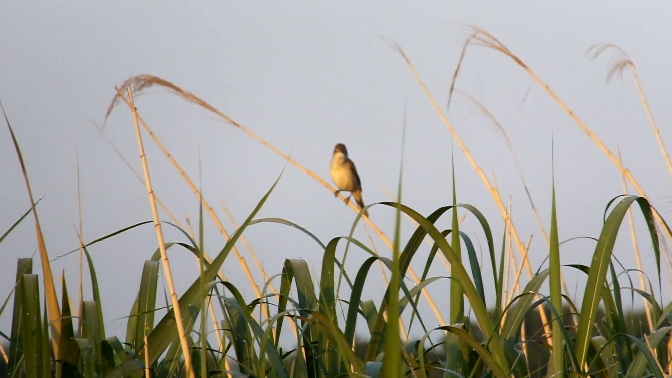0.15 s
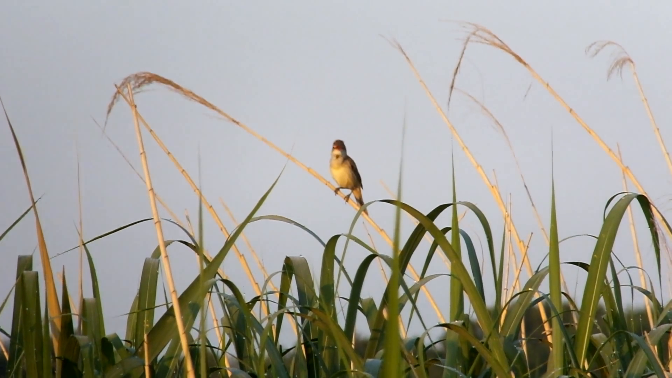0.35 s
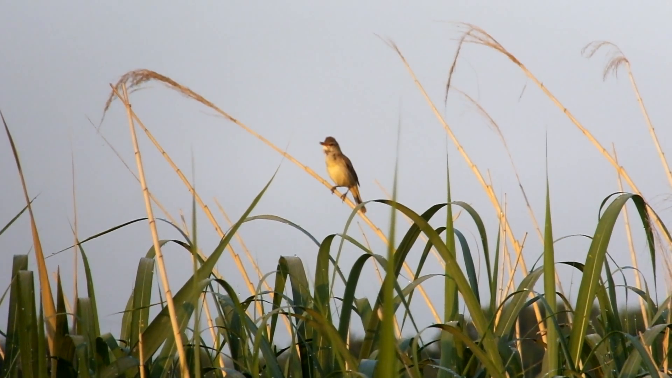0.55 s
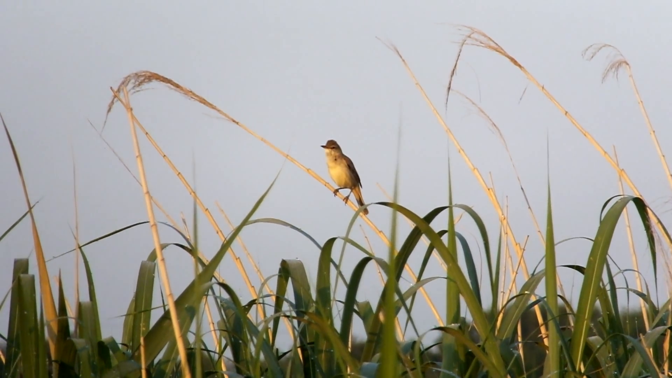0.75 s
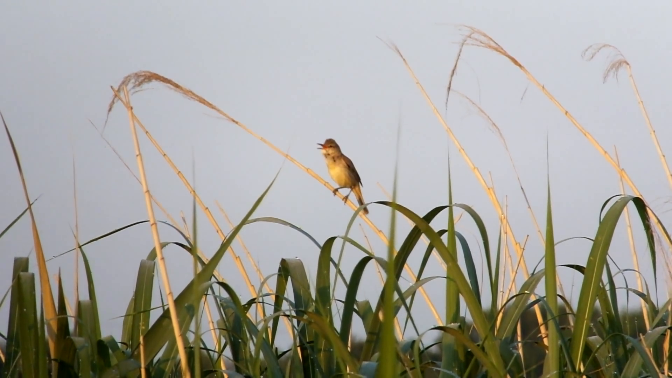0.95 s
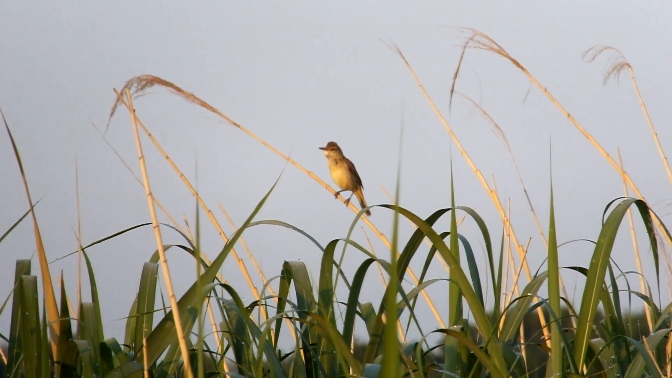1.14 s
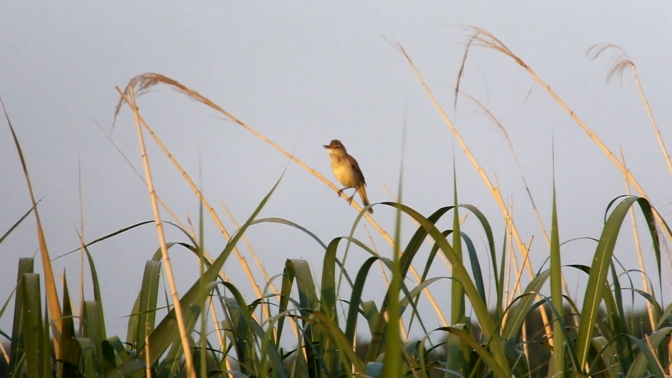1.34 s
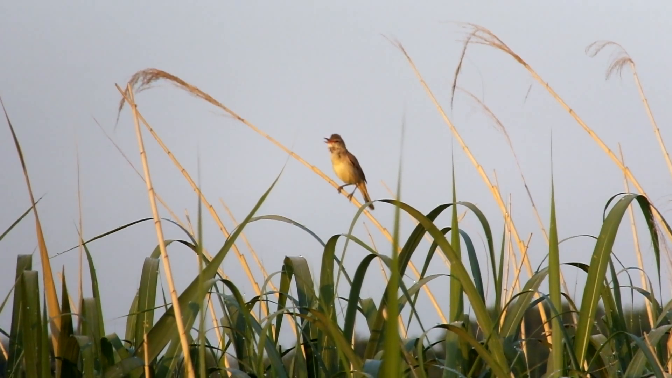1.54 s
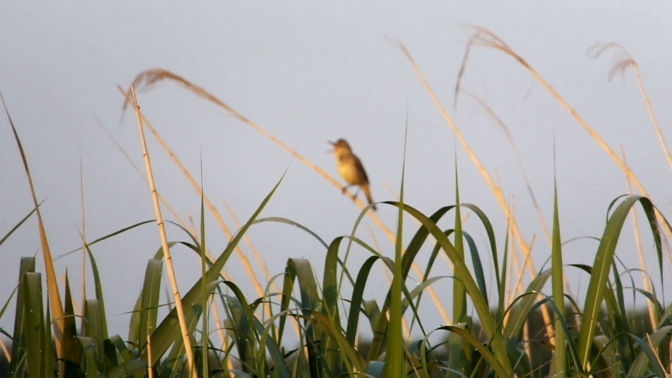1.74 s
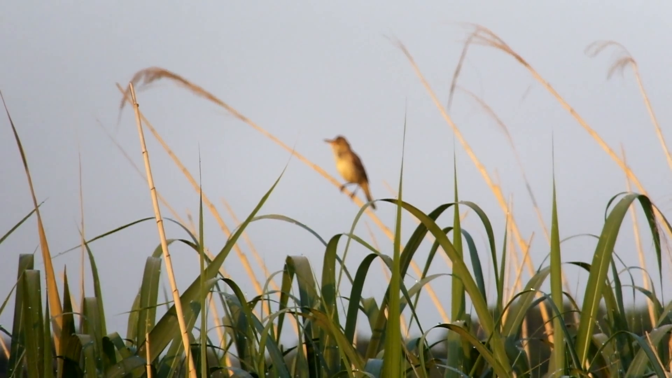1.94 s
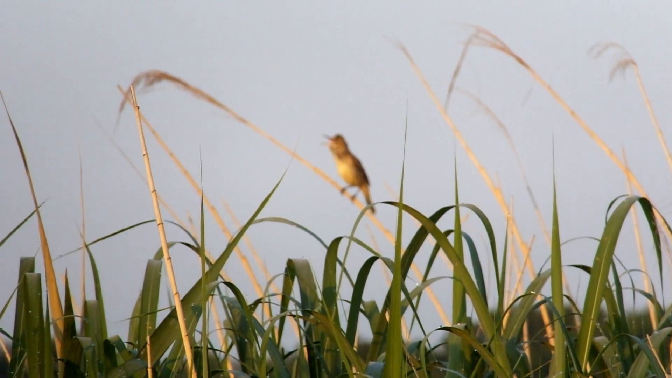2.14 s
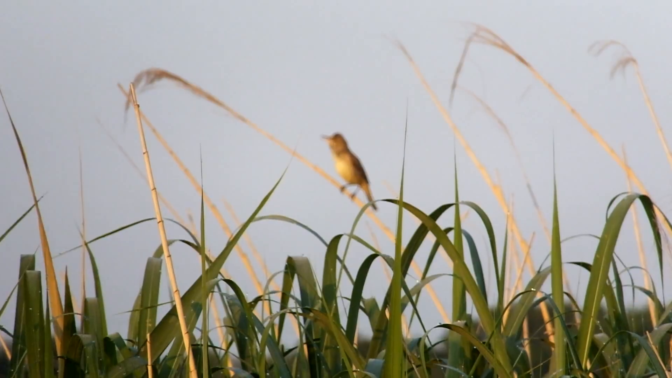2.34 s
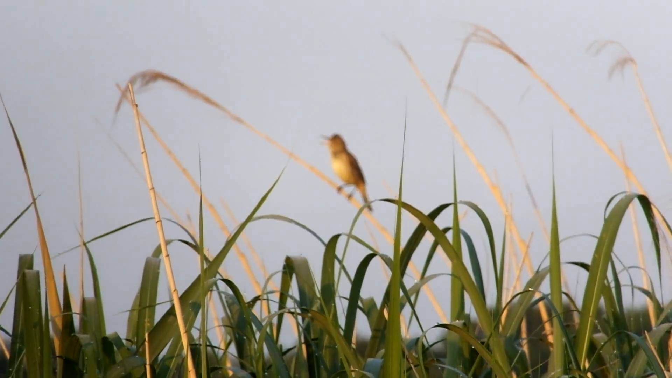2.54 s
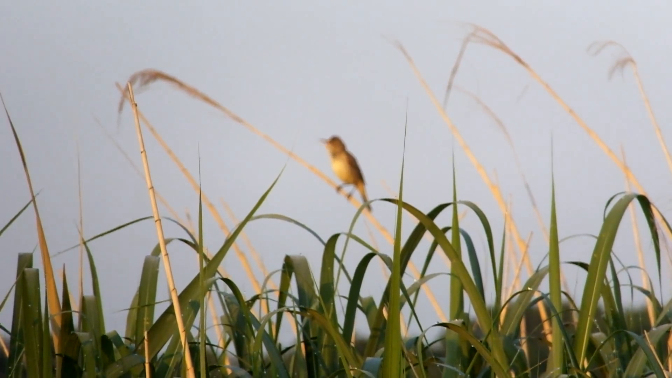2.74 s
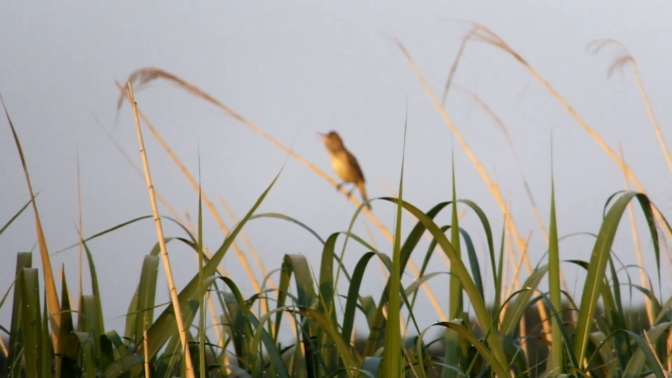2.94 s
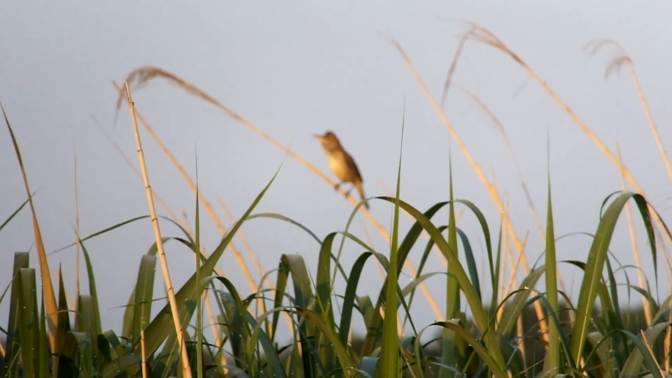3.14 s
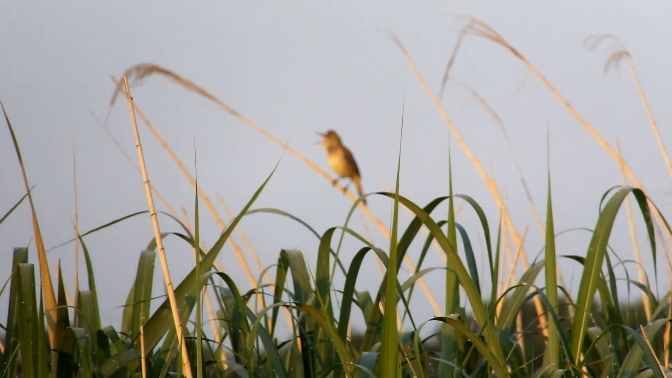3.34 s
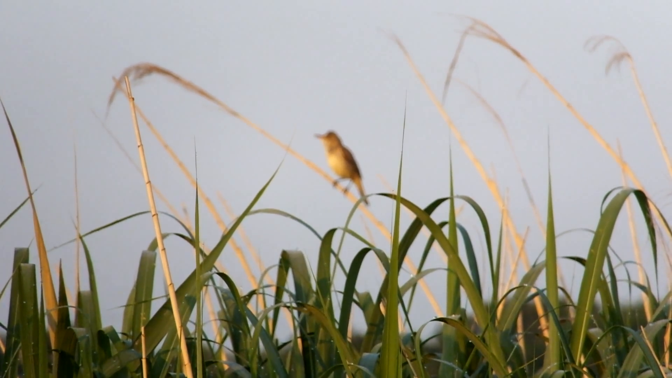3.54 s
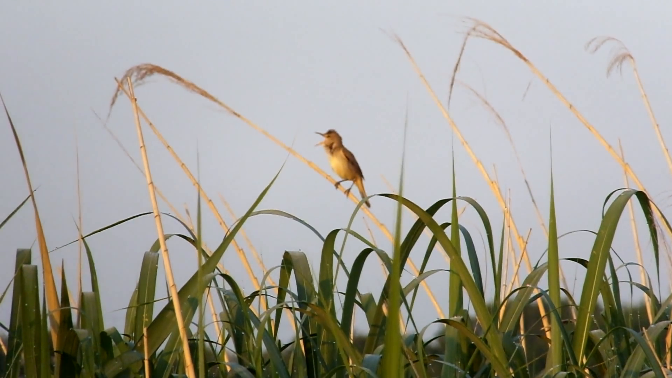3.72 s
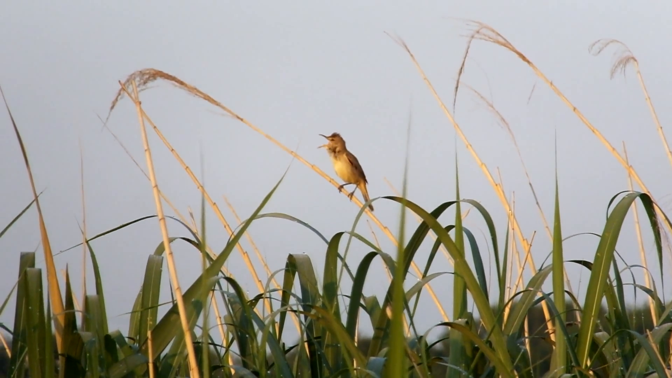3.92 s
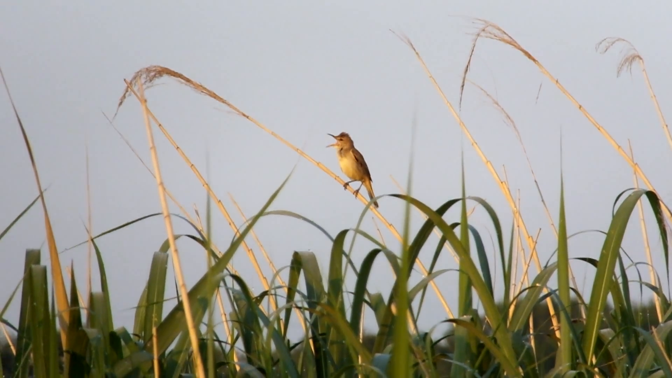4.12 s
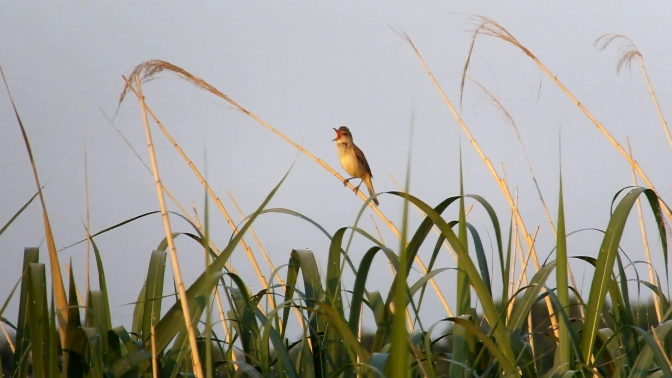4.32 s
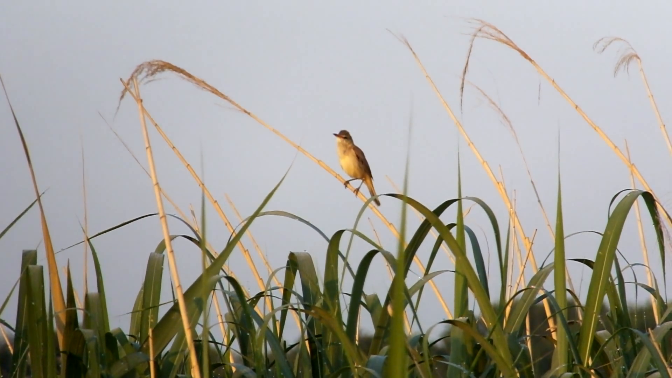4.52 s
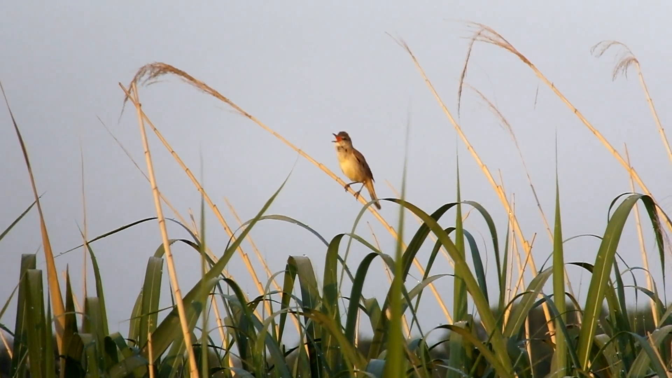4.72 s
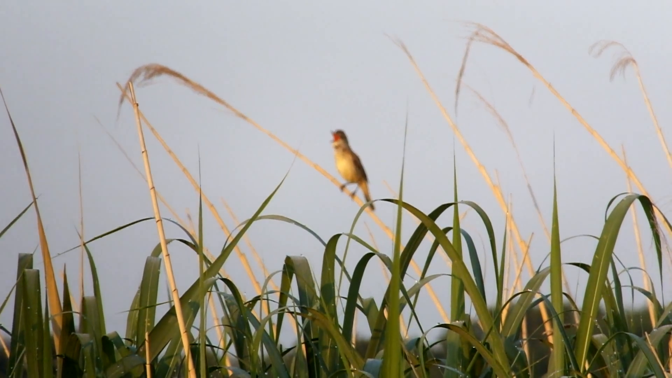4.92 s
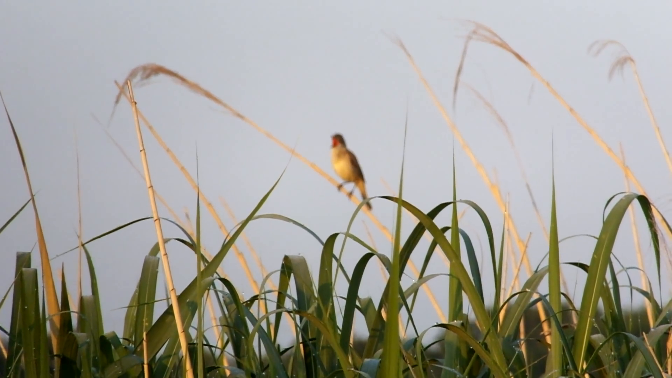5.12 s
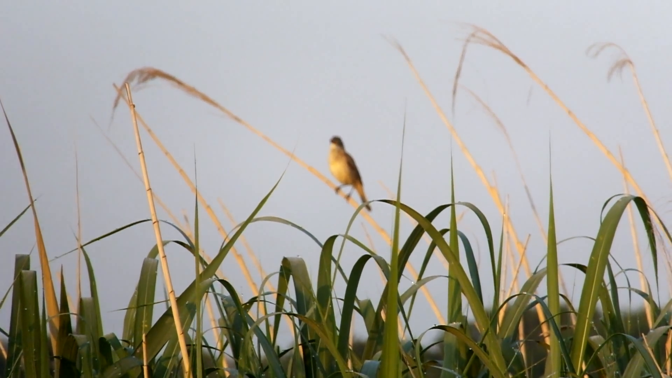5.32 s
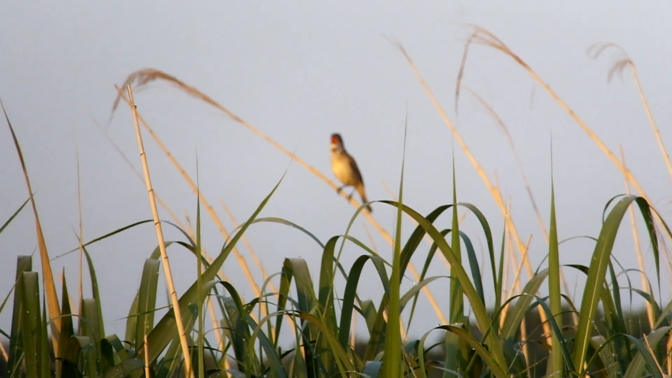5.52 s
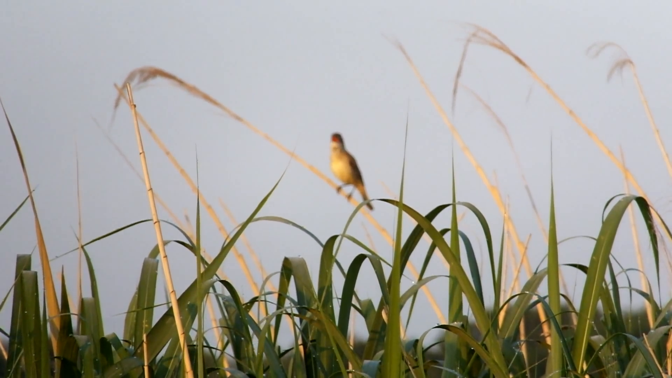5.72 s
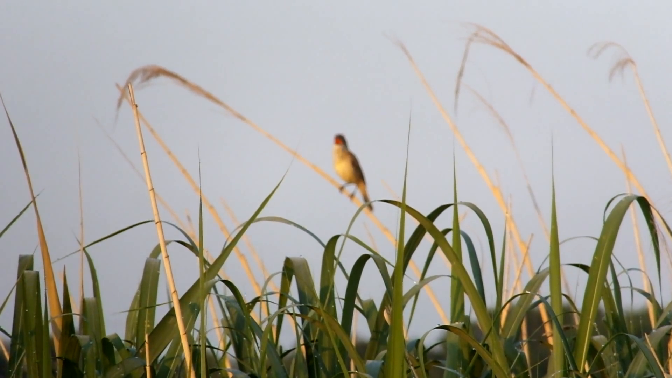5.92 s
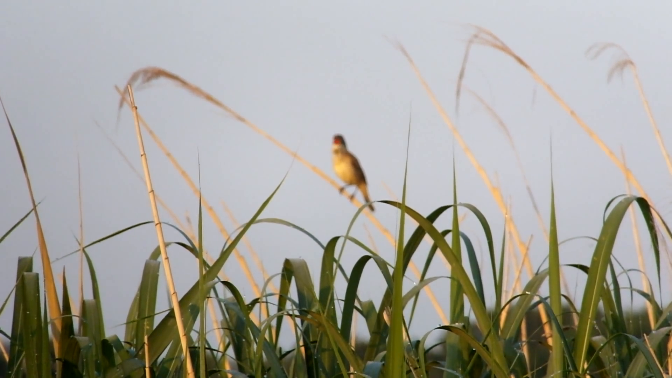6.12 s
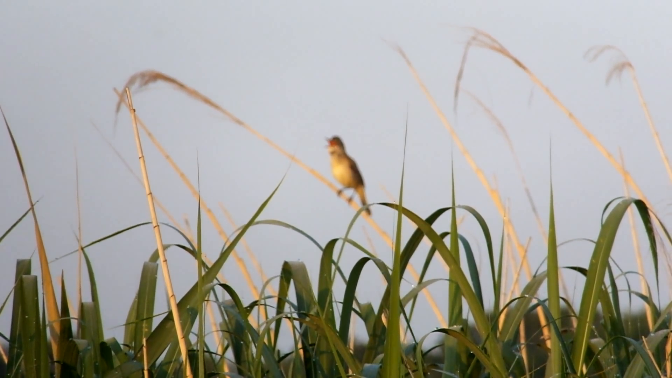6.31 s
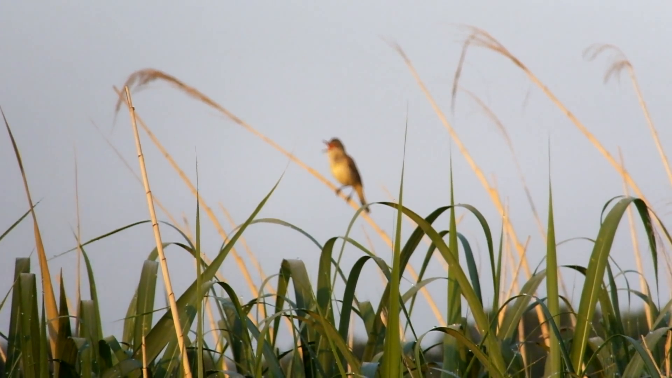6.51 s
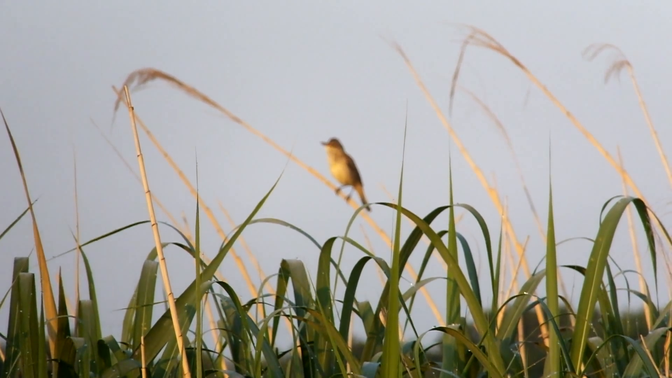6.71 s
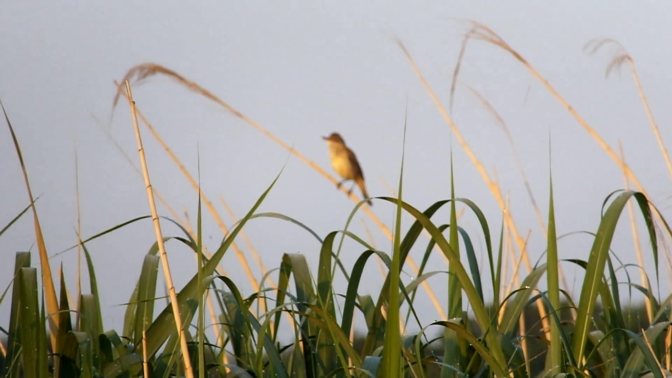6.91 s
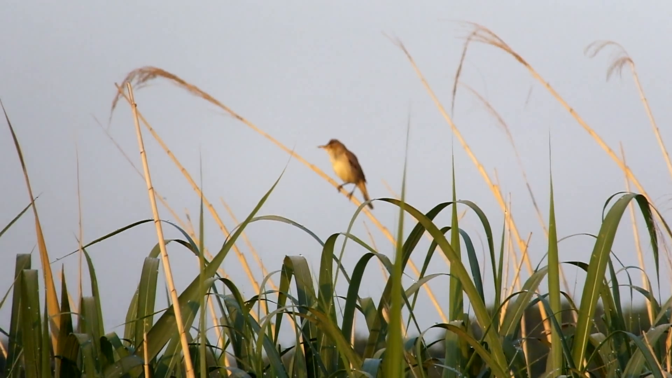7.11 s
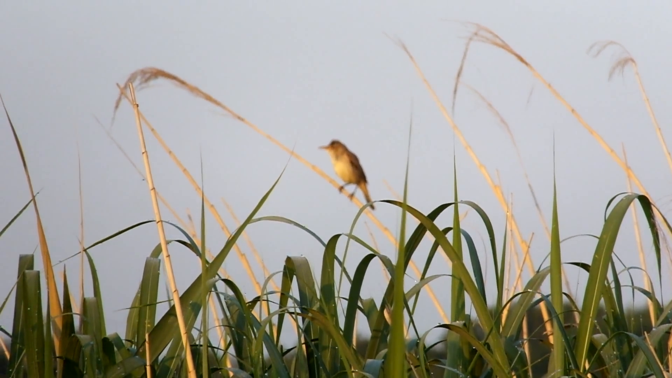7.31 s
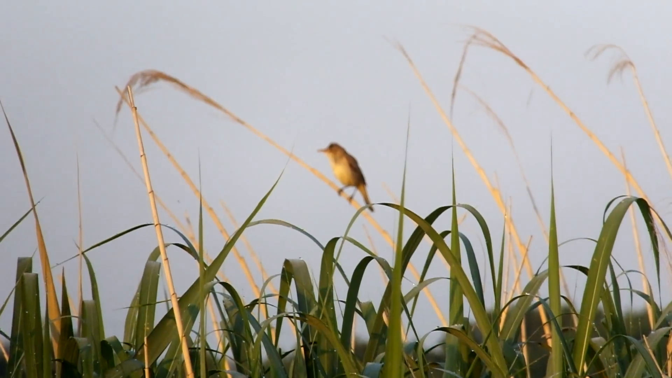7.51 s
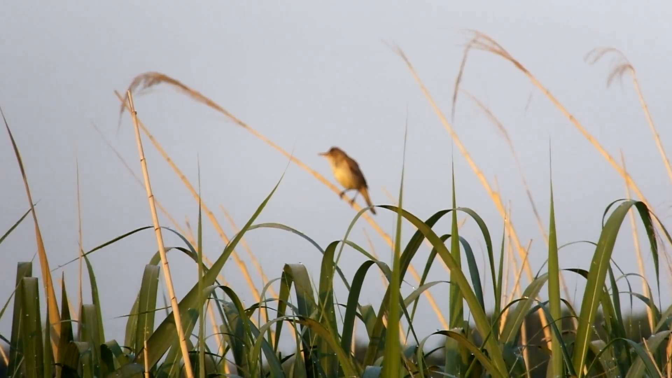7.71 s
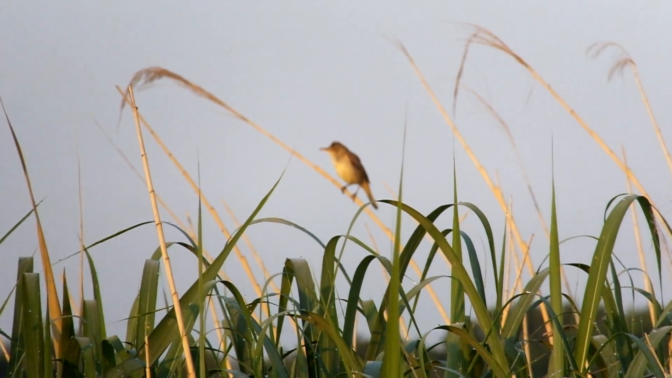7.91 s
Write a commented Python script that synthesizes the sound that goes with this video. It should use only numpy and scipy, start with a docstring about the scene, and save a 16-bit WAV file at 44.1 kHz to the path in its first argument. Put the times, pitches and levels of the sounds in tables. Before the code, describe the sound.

Loud, dry, chattering warbler song among reeds, in stereo, with a short leafy scatter and little echo. Croaks give way to double croaks and cracking squeaks, then quick rasps and upward whistles, then three rounds of two rattles and a buzzing trill. Behind are a faint steady low hiss and a briefly humming far motor. A dull tap hits the left microphone midway; a faint distant bird and low wind follow the song.

```python
"""A reed warbler sings: dry creaks, harsh croaks and rattles, swelling rasps, thin whistles, squeaks that
break to a lower voice, and buzzy trills. Uneven pulses and breath drive the harsh voice; gliding tones
make the pure one; reeds scatter both. Behind it the marsh hisses (shaped noise), a far motor hums and a
far bird calls (narrow noise bands), and wind buffets late, mostly at the right. A few sharp ticks (dying
modes) sound at the left, and something taps the left microphone once."""
import sys
import numpy as np
from scipy import signal
from scipy.fft import rfft, irfft, next_fast_len
from scipy.io import wavfile

SR = 44100
rng = np.random.default_rng(int(sys.argv[2]) if len(sys.argv) > 2 else 0)


def unload_audio(sound):
    """Save the sound as a 16-bit wav file, at the path given as the first command line argument."""
    columns = np.transpose(np.atleast_2d(sound))
    # keep every value between -1 and 1, then stretch to whole-number steps
    steps = np.round(np.clip(columns, -1, 1) * 32767)
    wavfile.write(sys.argv[1], SR, steps.astype(np.int16))


N = 355269
TIME_S = np.arange(N) / SR

# marsh spectrum: (frequency [Hz], relative level [dB])
MARSH_SPECTRUM = [(20, -19.5), (40, -4.5), (75, 1), (210, -1.5), (300, -6.5), (500, -11), (850, -9.5),
                  (1500, -17.5), (2600, -20.5), (3600, -27.5), (4600, -20.5), (5700, -35.5), (9500, -47.5),
                  (15000, -72)]
# marsh likeness of the two channels: (frequency [Hz], correlation [-1..1])
MARSH_CORRELATION = [(60, 0.86), (180, 0.91), (550, 0.78), (1650, 0.58), (4970, -0.43), (15000, 0.8)]
# marsh balance: (frequency [Hz], left over right [dB])
MARSH_BALANCE = [(60, -0.5), (180, 0.5), (550, 1), (1650, 3), (4970, 9.5), (15000, -13.5)]
MARSH_DB = -46.82
# far motor: (time [s], level [dB], pitch [Hz])
MOTOR = [(1.9, -67, 109.4), (2.1, -50, 109.6), (2.6, -52.5, 113.3), (3.1, -51, 122.5), (3.55, -53.5, 126.6),
         (3.9, -72, 122)]
# far bird: (time [s], level [dB], pitch [Hz])
FAR_CALL = [(7.1, -75, 1600), (7.22, -57, 1660), (7.33, -59, 1610), (7.41, -59, 1490), (7.46, -75, 1450)]
# wind on the microphones, before the left/right gains: (time [s], level [dB])
GUST = [(7.45, -67), (7.6, -44.5), (7.77, -43), (7.86, -52), (7.94, -48), (7.99, -29.5), (8.06, -40)]

TAP_S = 4.0955
# ring of the tapped microphone's housing: (frequency [Hz], level [dB], t60 [s])
TAP_MODES = [(91, -24.5, 0.051), (161, -16.5, 0.047), (214, -25.5, 0.16), (736, -13.5, 0.012),
             (3080, -27, .005), (4970, -12.5, 0.0025)]
# sharp ticks, before the left/right gains: (time [s], level [dB])
TICKS = [(1.65, -26), (2.4111, -21), (5.3148, -25.5), (6.950, -30.5)]
# ring of a tick: (frequency [Hz], relative level [dB], t60 [s])
TICK_MODES = [(3360, 1.5, 0.012), (4060, 1, 0.0087), (4850, -7.5, 0.015), (6730, -7.5, 0.003),
              (9550, -21.5, 0.0036)]

# song at the left microphone: (frequency [Hz], gain [dB])
LEFT_SHADE = [(1300, -1.5), (2400, -3), (4400, 0), (6000, -1.5), (9500, -13), (15000, 0.5)]
# beak: (frequency [Hz], gain [dB])
BEAK = [(6500, -1), (8300, 2), (9800, 5), (11000, -7), (12500, -10), (15000, -32)]
# fixed peaks and dips of the harsh voice: (centre [Hz], width [Hz], gain [dB])
HARSH_PEAKS = [(1270, 170, 9), (1560, 80, -11), (1850, 120, 7), (2030, 60, -7), (2260, 60, -8),
               (2430, 85, 6.5), (2590, 60, -5), (2800, 100, 2), (3100, 120, -3), (3330, 80, 3),
               (3510, 60, -5), (3740, 130, 4)]
# broad skirt of the voice's pulses: (frequency [Hz], relative gain [dB])
PULSE_SKIRT = [(300, -29), (1100, 4), (2500, 24), (4400, -22.5), (5700, 10), (7700, 1.5), (9000, 2.5),
               (12300, -40), (14000, -65), (15500, -74)]
# treble of the croaks and rattles: (frequency [Hz], gain [dB])
CROAK_TREBLE = [(3000, -0.5), (3900, 0.5), (4600, -5), (5900, -8), (7500, 5.5), (10000, 3), (12500, -1)]

# opening croaks: (start [s], nominal level [dB], centre [Hz])
CROAKS = [(.514, -32, 2370), (1.062, -32, 2427)]
CROAK_S, CROAK_SWELL_S, CROAK_SOFT_DB = 0.078, 0.0281, -9
# moments when a croak catches: (time after its start [s])
CROAK_CATCHES_S = [0.01, 0.0243, 0.058]
CREAK_LEAD_S, CREAK_S, CREAK_DB, CREAK_PULSE_HZ = 0.13, 0.12, -44, 219.4

# double croaks: (start [s], start of short pulse [s], nominal level [dB], long pulse [Hz], short pulse [Hz])
DOUBLES = [(1.461, 1.512, -33.5, 1952, 2057), (1.605, 1.656, -34, 2020, 2290),
           (2.156, 2.211, -32, 2326, 2450), (2.314, 2.366, -34.5, 1938, 2250),
           (2.456, 2.512, -34.5, 2147, 2094), (2.968, 3.023, -32, 2246, 2225),
           (3.124, 3.178, -33.5, 2134, 2180)]
PAUSE_S, SHORT_S, SHORT_DB, SHORT_FALL_HZ = 0.0077, 0.02354, -0.4, 520
SCOOP_HZ, SCOOP_S, CLIMB_HZ = 633, 0.00708, 296  # the long pulse drops into its pitch, then climbs
ACCENT_DB, ACCENT_S, HOLD_DB, CLIMB_DB = 6, 0.015, -3, 4.5  # it starts accented and swells as it climbs

# rattles: (start [s], end [s], first stop [s], second stop [s], nominal level [dB], centre [Hz],
#           level of the creak before it [dB])
RATTLES = [(4.786, 4.862, 4.807, 4.837, -29, 2883, -34.5), (4.946, 5.019, 4.967, 4.999, -27.7, 2960, -35),
           (5.508, 5.587, 5.528, 5.562, -29, 2788, -37.5), (5.673, 5.751, 5.699, 5.728, -27.5, 2983, -30.5),
           (6.191, 6.269, 6.213, 6.243, -28.6, 2838, -32.5), (6.366, 6.445, 6.388, 6.416, -29, 2793, -28.5)]
RATTLE_SAG_HZ, STOP_S, STOP_DB = 219, 0.0023, -21.5
STUTTER_S, STUTTER_DB = 0.01, -7.5  # a weaker stop just before the second
LEAD_IN_S, LEAD_IN_PULSE_HZ = .029, 154

# rasps: (start [s], end [s], nominal peak level [dB])
RASPS = [(3.641, 3.717, -28.5), (3.741, 3.814, -28.5), (3.934, 4.006, -28.5), (4.036, 4.105, -29.5),
         (4.233, 4.304, -28), (4.333, 4.403, -26.5)]

# rising whistles: (start [s], end [s], peak level [dB], start pitch [Hz], end pitch [Hz])
WHISTLES = [(3.365, 3.421, -39.5, 4900, 6250), (3.843, 3.9, -39.5, 5820, 6360),
            (4.14, 4.189, -37.5, 5430, 6520), (4.439, 4.5, -40, 5550, 6330)]
# squeaks: (start [s], break [s], end [s], whistle level [dB], whistle pitch [Hz], its rise [Hz], yelp [Hz])
SQUEAKS = [(1.748, 1.779, 1.794, -37.5, 5530, 204, 3340), (1.852, 1.876, 1.904, -41, 5300, 500, 3140),
           (2.599, 2.637, 2.654, -40.5, 5400, 302, 3230), (2.711, 2.743, 2.762, -39.5, 5310, 500, 3196),
           (3.264, 3.288, 3.318, -40, 5360, -400, 3150)]
OVERLAP_S, YELP_DB, YELP_RISE_HZ = 0.0098, 1, 554

# trills: (start [s], end [s], nominal level [dB], centre [Hz], dip [Hz])
TRILLS = [(5.083, 5.235, -38.5, 5270, 600), (5.811, 5.984, -38.5, 4820, 118),
          (6.509, 6.661, -39.5, 4910, 279)]
TRILL_RATE_HZ, TRILL_END_HZ, TRILL_DEPTH_HZ = 144, 3930, 572
DIP_AT, DIP_WIDTH, SINK_FROM = .36, .13, 0.55  # shares of a trill's length
# windpipe's pass band in a trill: (frequency [Hz], gain [dB])
TRILL_THROAT = [(2600, -9), (3300, -5), (3780, 6), (4150, -2), (5250, 1.5), (5800, -4.5), (6500, 7.5),
                (9000, -1)]


def amp(db):
    """Decibels to gain."""
    return 10 ** (np.asarray(db) / 20)


def unit(x):
    """Scales to rms 1."""
    return x / np.sqrt(np.mean(abs(x) ** 2) + 1e-20)


def read(points, hz):
    """Reads a table on a log-frequency axis."""
    f, value = np.transpose(points)
    return np.interp(np.log(hz + 1), np.log(f + 1), value)


def add(mix, start_s, sound):
    """Mixes a sound in at start_s."""
    part = mix[round(start_s * SR):][:len(sound)]
    part += sound[:len(part)]


def span(start_s, end_s):
    """Progress from 0 to 1 through a note, one value a sample."""
    return np.linspace(0, 1, max(round((end_s - start_s) * SR), 64))


def bump(x, centre, width):
    """A smooth hump of height 1."""
    return np.exp(-((x - centre) / width) ** 2)


def noise(size):
    """White noise from a stream of its own."""
    return rng.spawn(1)[0].standard_normal(size)


def wander(size, rate_hz):
    """Random curve of rms near 1: straight lines between rate_hz knots a second."""
    at = np.arange(size) * rate_hz / SR
    knots = noise(int(at[-1]) + 2)
    return 1.2 * np.interp(at, np.arange(len(knots)), knots)


def fade(u, rise_s, fall_s):
    """Opens and closes a note of u's length."""
    t = np.arange(len(u)) / SR
    return np.clip(t / rise_s, 0, 1) * np.clip((t[-1] - t) / fall_s, 0, 1)


def phase(hz):
    """Running phase [rad] of a pitch curve."""
    return 2 * np.pi * np.cumsum(hz) / SR


def filtered(x, order, edge_hz, kind="low"):
    """Butterworth filter."""
    return signal.lfilter(*signal.butter(order, edge_hz, kind, fs=SR), x)


def resonate(x, hz, width_hz):
    """A steep, movable resonance; the result is complex, its size is the envelope."""
    turn = np.exp(1j * phase(hz * np.ones(len(x))))
    lowpass = signal.butter(3, width_hz / 2, fs=SR, output="sos")
    return unit(turn * signal.sosfilt(lowpass, x / turn))


def colour(x, db_at):
    """Causal (minimum-phase) filter whose gain in dB is a function of frequency."""
    log_gain = np.log(amp(db_at(abs(np.fft.fftfreq(2048, 1 / SR)))))
    impulse = np.fft.ifft(np.exp(np.conj(signal.hilbert(log_gain)))).real
    return signal.fftconvolve(x, impulse)[:len(x)]


def marsh():
    """Low far rumble and soft hiss with a band of sizzle to the left; the level wavers slightly."""
    size = next_fast_len(N)
    hz = np.fft.rfftfreq(size, 1 / SR)
    a, b = rfft(noise(size)), rfft(noise(size))
    same = np.clip(read(MARSH_CORRELATION, hz), -1, 1)
    tilt_db = read(MARSH_BALANCE, hz) / 2
    left = a * amp(tilt_db)
    right = (same * a + np.sqrt(1 - same ** 2) * b) * amp(-tilt_db)
    hiss = irfft(np.array([left, right]) * amp(read(MARSH_SPECTRUM, hz)), size)[:, :N]
    return amp(MARSH_DB + .5 * wander(N, 5)) * unit(hiss)


def far_line(rows, width_hz):
    """A distant pitched sound, blurred on its way: a narrow noise band with its swing saturated."""
    s, db, hz = np.transpose(rows)
    out, t = np.zeros(N), np.arange(s[0], s[-1], 1 / SR)
    line = resonate(noise(len(t)), np.interp(t, s, hz), width_hz)
    steadied = unit((line / (abs(line) + .5)).real)
    add(out, s[0], amp(np.interp(t, s, db)) * steadied)
    return out


def gust():
    """Lumpy low buffeting: band-passed noise, mostly on the right microphone."""
    s, db = np.transpose(GUST)
    lumps = np.array([unit(filtered(noise(N), 2, [22, 130], "band")) for side in range(2)])
    return lumps * amp(np.interp(TIME_S, s, db, left=-120)) * amp([[-10], [1]])


def ring(modes, t, rise_s):
    """Dying modes after a soft-edged blow."""
    dying = sum(amp(db - 60 * t / t60) * np.sin(2 * np.pi * hz * t) for hz, db, t60 in modes)
    return dying * (1 - np.exp(-(t / rise_s) ** 2))


def tap(push_db=-3, push_s=0.00018):
    """A brief push of pressure on one microphone; its housing swings back and rings."""
    out, t = np.zeros(N), np.arange(6000) / SR
    add(out, TAP_S - .001, amp(push_db) * bump(t, .0013, push_s))
    add(out, TAP_S + 0.00061, -ring(TAP_MODES, t, rise_s=0.00009))
    return out


def ticks():
    """Short dry ticks, close by: quickly dying modes."""
    out, t = np.zeros(N), np.arange(2000) / SR
    for start, db in TICKS:
        add(out, start, amp(db) * ring(TICK_MODES, t, rise_s=0.00032))
    return out


def reeds(x, t60=0.45, leaf_db=-7, leaf_s=0.0073, stem_db=-21, stem_s=0.023, late_db=-23):
    """Leaves spray the treble back, stems the middle; a faint dull tail follows."""
    t = np.arange(SR // 2) / SR
    out = []
    for side in range(2):
        leaves = filtered(noise(len(t)), 2, 7000, "high") * np.exp(-t / leaf_s) * (t > .001)
        stems = filtered(noise(len(t)), 1, 6000) * np.exp(-t / stem_s) * (t > .002)
        far = filtered(noise(len(t)), 2, 4500) * amp(-60 * t / t60) * (t > .008)
        parts = [(leaf_db, leaves), (stem_db, stems), (late_db, far)]
        echo = sum(amp(db) * part / np.linalg.norm(part) for db, part in parts)
        out.append(signal.oaconvolve(x, echo)[:N])
    return np.array(out)


def beak(x):
    """The beak passes the overtones of the pure notes up to its resonance, and few above."""
    return colour(x, lambda f: read(BEAK, f))


def tone(hz, waver, overtones_db):
    """A slightly unsteady pure voice with weak overtones."""
    angle = phase(hz * (1 + waver * wander(len(hz), 700)))
    overtones = sum(amp(db) * np.sin(k * angle) for k, db in enumerate(overtones_db, 2))
    return np.sqrt(2) * (np.sin(angle) + overtones)


def whistle(hz):
    """A thin tone that swells towards its end."""
    u = np.linspace(0, 1, len(hz))
    swell = amp(np.interp(u, [0, .75, 1], [-9, 0, -1]))
    return swell * tone(hz, 0.0059, [-24]) * fade(u, 0.0059, 0.0029)


def whistles():
    """Thin tones that bend upward."""
    out = np.zeros(N)
    for start, end, db, low, high in WHISTLES:
        add(out, start, amp(db) * whistle(low + (high - low) * span(start, end) ** 2.1))
    return out


def squeaks():
    """A whistle levels off, breaks to a low yelp and ends in a high flick."""
    out = np.zeros(N)
    for start, crack, end, db, hz, rise, low in SQUEAKS:
        add(out, start, amp(db) * whistle(hz - rise * (1 - span(start, crack + OVERLAP_S)) ** 2))
        u = span(crack, end)
        yelp = tone(low + YELP_RISE_HZ * u ** 4.2, 0.0087, [-8, -19, -31])
        add(out, crack, amp(db + YELP_DB) * yelp * fade(u, 0.0042, 0.003))
        u = span(end - .005, end + 0.0092)
        flick = tone((low + YELP_RISE_HZ) * (1.51 + 0.28 * u), 0.0089, [])
        add(out, end - .005, amp(db + 3.5) * flick * fade(u, 0.0014, 0.02))
    return out


def trills():
    """A whistle swung quickly up and down; it dips once, then sinks, swells and breaks into fast pulses."""
    out = np.zeros(N)
    for start, end, db, centre, dip_hz in TRILLS:
        u = span(start, end)
        dip = bump(u, DIP_AT, DIP_WIDTH)
        sink = np.sin(np.pi / 2 * np.interp(u, [SINK_FROM, .96], [0, 1])) ** 2
        hz = centre - 300 * np.exp(-u / 0.029) - dip_hz * dip + (TRILL_END_HZ - centre) * sink
        depth = np.interp(u, [.08, .24, .75, 1], [0.063, 0.97, .95, 0.41])
        effort_db = db - 17 * np.maximum(1 - u / 0.17, 0) - 3 * dip + 4 * bump(u, .86, 0.038)
        turn = phase(TRILL_RATE_HZ * (1 + 0.048 * wander(len(u), 58)))
        swing = np.sin(turn) + 0.1 * np.cos(2 * turn)  # lingers at the top, dips quickly
        pitch = hz + TRILL_DEPTH_HZ * (depth * swing + 0.203 * (1 - depth))
        octave_db = -30 + 17 * bump(2 * pitch, 9640, 1070)  # the windpipe lifts the octave
        rough = resonate(noise(len(u)), np.maximum(hz - 600, 4050), width_hz=1100).real * amp(-7)
        fizz = resonate(noise(len(u)), 9000, width_hz=4000).real * amp(-19.5)
        flutter = 1 + 0.62 * sink * np.sin(phase(600 * (1 + .1 * wander(len(u), 299))))
        voice = tone(pitch, 0.011 + 0.023 * sink, [octave_db]) * flutter + (rough + fizz) * depth ** 2
        add(out, start, amp(effort_db + 1.85 * swing) * voice * fade(u, 0.0038, 0.0063))
    return colour(out, lambda f: read(TRILL_THROAT, f))


def pulses(size, rate_hz, jitter):
    """The vocal membranes snap at an uneven rate."""
    turns = np.cumsum(rate_hz * np.exp(jitter * wander(size, rate_hz))) / SR
    return unit(np.diff(np.floor(turns), prepend=-1))


def creak(length_s, rate_hz, throat_hz, edge_s):
    """Slow, dry pulsing of the voice through two throat resonances."""
    u = span(0, length_s)
    snaps = pulses(len(u), rate_hz, jitter=0.054) + .1 * noise(len(u))
    narrow = resonate(snaps, throat_hz - 170, width_hz=490).real
    wide = resonate(snaps, throat_hz, width_hz=1130).real
    return unit(narrow + amp(7.0) * wide) * fade(u, edge_s, 1.53 * edge_s)


def harsh(hz, rate_hz, jitter, breath, width_hz, pure, skirt_db, top_hz, top_width_hz, top_db):
    """Chaotic pulses and breath jolt a self-sustained tone, whose swing saturates, and ring the windpipe."""
    snaps = pulses(len(hz), rate_hz, jitter)
    puffs = signal.lfilter([1], [1, -np.exp(-1 / (0.0011 * SR))], abs(snaps))  # one each snap
    air = unit(noise(len(hz)) * puffs)
    ringing = resonate(snaps + breath * air, hz, width_hz)
    sung = np.exp(1j * phase(hz * (1 + 0.0785 * wander(len(hz), 900))))
    swing = ringing + pure * sung
    throat = unit((swing / np.sqrt(abs(swing) ** 2 + .5)).real)
    skirt = unit(colour(air + 0.54 * snaps, lambda f: read(PULSE_SKIRT, f)))
    top = unit(resonate(air, top_hz, top_width_hz).real)
    return throat + amp(skirt_db) * skirt + amp(top_db) * top


def burst(hz, pure, top_db):
    """The harsh, fluttering voice on a pitch curve; a higher throat is also wider and brighter."""
    opening = np.interp(hz.mean(), [2350, 3000], [0, 1])
    voice = harsh(hz, rate_hz=500, jitter=.15, breath=0.31, width_hz=1150 + 650 * opening, pure=pure,
                  skirt_db=-29, top_hz=10100 + 1900 * opening, top_width_hz=1900 + 1000 * opening,
                  top_db=top_db)
    flutter_db = 1.5 * np.sin(phase(200 * (1 + 0.12 * wander(len(hz), 149))))
    treble = colour(voice, lambda f: read(CROAK_TREBLE, f))
    return treble * amp(flutter_db) * fade(hz, 0.0034, 0.0058)


def croaks():
    """A long creak, then a croak that swells, settles on a steady pitch and catches three times."""
    out, t = np.zeros(N), np.arange(0, CROAK_S, 1 / SR)
    soft = np.maximum(1 - t / CROAK_SWELL_S, 0)
    effort_db = CROAK_SOFT_DB * soft - 11 * sum(bump(t, s, 0.0025) for s in CROAK_CATCHES_S)
    for start, db, hz in CROAKS:
        lead = creak(CREAK_S, CREAK_PULSE_HZ, throat_hz=2610, edge_s=0.025)
        add(out, start - CREAK_LEAD_S, amp(CREAK_DB) * lead)
        add(out, start, amp(db + effort_db) * burst(hz + 250 * soft, pure=.7, top_db=-34.5))
    return out


def double_croaks():
    """An accented, scooping pulse, a pause, and a short pulse that falls and fades."""
    out = np.zeros(N)
    for start, second, db, long_hz, short_hz in DOUBLES:
        t = np.arange(0, second - start - PAUSE_S, 1 / SR)
        hz = long_hz + SCOOP_HZ * np.exp(-t / SCOOP_S) + CLIMB_HZ * (t / t[-1]) ** 3
        effort_db = HOLD_DB + ACCENT_DB * bump(t, 0.0028, ACCENT_S) + CLIMB_DB * bump(t, 0.042, 0.0079)
        add(out, start, amp(db + effort_db) * burst(hz, pure=0.95, top_db=-36.5))
        fall = span(0, SHORT_S) - .5
        short = burst(short_hz + 40 - SHORT_FALL_HZ * fall, pure=0.93, top_db=-34)
        add(out, second, amp(db + SHORT_DB - 5.6 * fall) * short)
    return out


def rattles():
    """A brief creak, then a loud sagging note that stops twice and restarts sharp each time."""
    out = np.zeros(N)
    for start, end, first, second, db, centre, creak_db in RATTLES:
        u = span(start, end)
        t = start + (end - start) * u
        restart = sum(bump(t, s + 0.0032, 0.003975) for s in (start, first, second))
        shut = bump(t, first, STOP_S) + bump(t, second, STOP_S)
        stutter = bump(t, second - STUTTER_S, STOP_S)
        lead = creak(LEAD_IN_S - .004, LEAD_IN_PULSE_HZ, throat_hz=centre, edge_s=.019)
        add(out, start - LEAD_IN_S, amp(creak_db) * lead)
        note = burst(centre - RATTLE_SAG_HZ * (u - .5) + 170 * restart, pure=0.83, top_db=-40.5)
        add(out, start, amp(db + 0.5 + STOP_DB * shut + STUTTER_DB * stutter) * note)
    return out


def rasps():
    """Fast, breathy pulsing that swells as it sinks; it turns up and weakens at the end."""
    out = np.zeros(N)
    for start, end, db in RASPS:
        u = span(start, end)
        hz = np.interp(u, [0, .35, .7, .85, 1], [4320, 3840, 3510, 3210, 3500])
        pure = 0.2 + 4.0 * u ** 4  # clears as it ends
        voice = harsh(hz, rate_hz=1000, jitter=.35, breath=0.94, width_hz=2000, pure=pure,
                      skirt_db=-15, top_hz=9730, top_width_hz=1700, top_db=-23.5)
        voice += amp(-12.5) * u ** 3 * tone(hz / 2, 0.033, [])  # gains an undertone an octave down
        effort_db = np.interp(u, [0, .3, .8, 1], [-21.5, -7, -2.5, -7.5])
        add(out, start, amp(db + effort_db) * voice * fade(u, 0.0023, 0.0078))
    return out


def chatter():
    """Croaks, rattles and rasps: one rough voice at different pulse rates and throat sizes."""
    voice = croaks() + double_croaks() + rattles() + rasps()
    return colour(voice, lambda f: sum(db * bump(f, hz, width) for hz, width, db in HARSH_PEAKS))


def scene():
    """The bird is ahead and slightly to the right; its treble reaches the left microphone weaker."""
    song = chatter() + beak(whistles() + squeaks() + trills())
    scatter = reeds(song)
    left = colour(np.roll(song, 1) + scatter[0], lambda f: read(LEFT_SHADE, f))  # one sample late
    right = (song + scatter[1]) * amp(-1.22)
    bird = np.array([left, right])
    tick = ticks()
    near = tick * amp([[2], [-12]]) + amp(-6) * reeds(tick) + tap() * amp([[0], [-27]])
    far = far_line(MOTOR, width_hz=5.4) + far_line(FAR_CALL, width_hz=420)
    return bird + near + marsh() + far + gust()


def record(dry):
    """The recorder's band limit: a steep low-pass."""
    lowpass = signal.firwin(511, 15600, window=("kaiser", 9), fs=SR)
    return signal.oaconvolve(dry, lowpass[None], "same")


dry = scene()
out = record(dry)
unload_audio(out)
```